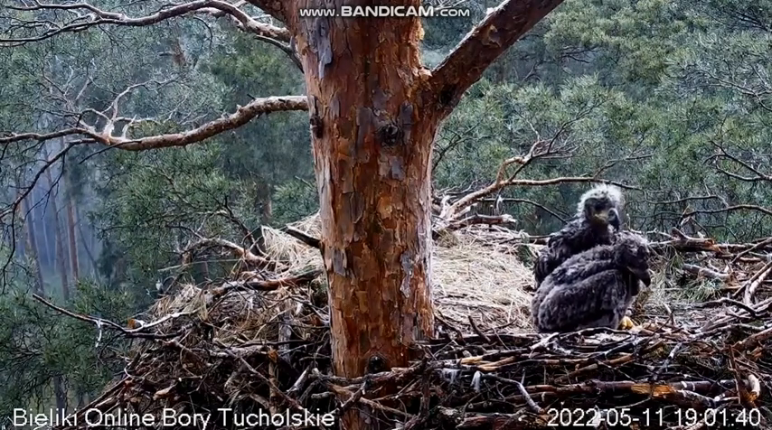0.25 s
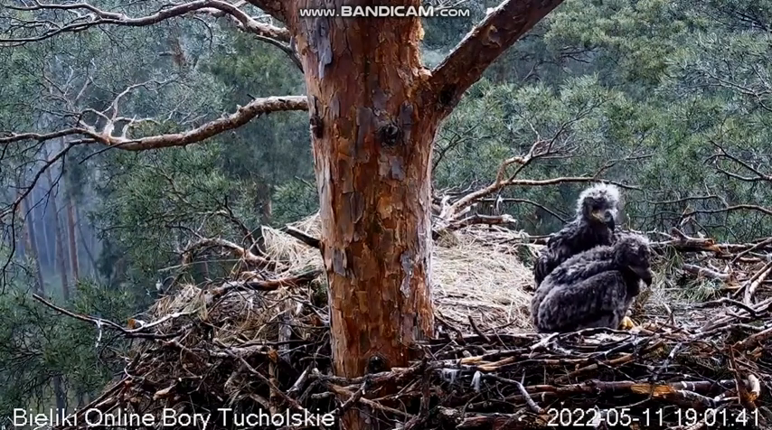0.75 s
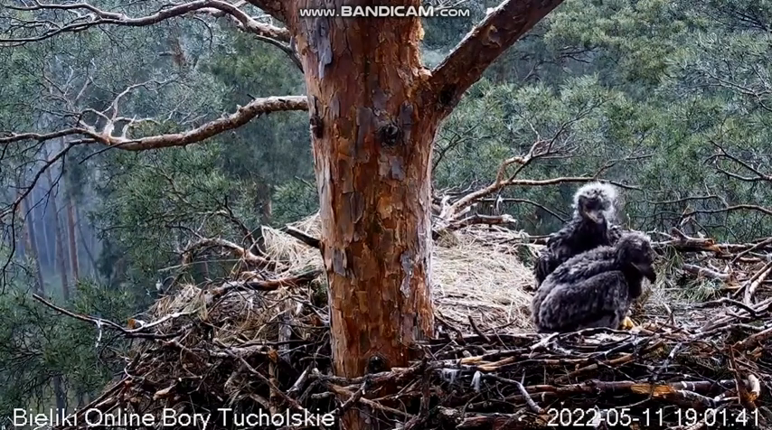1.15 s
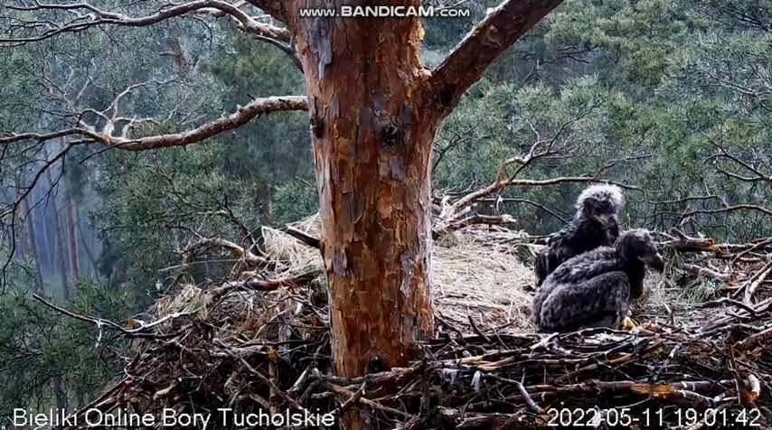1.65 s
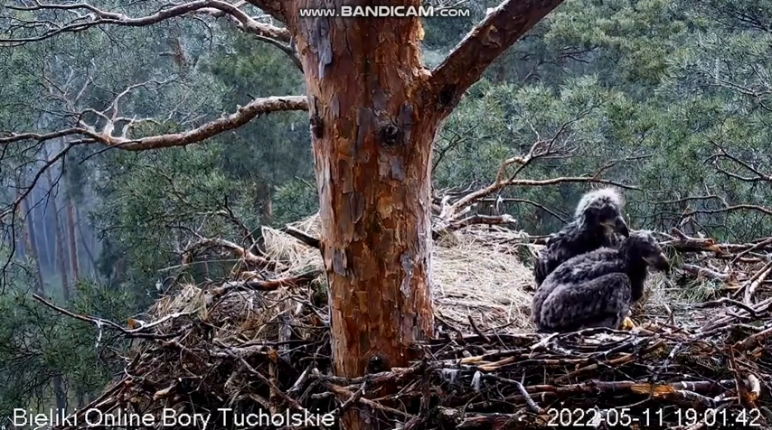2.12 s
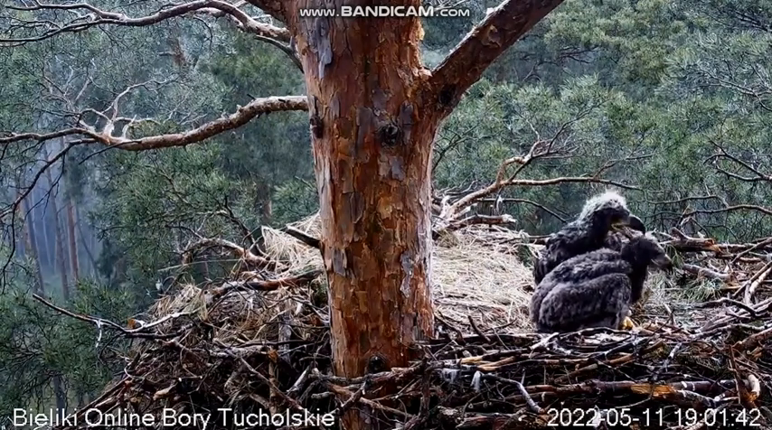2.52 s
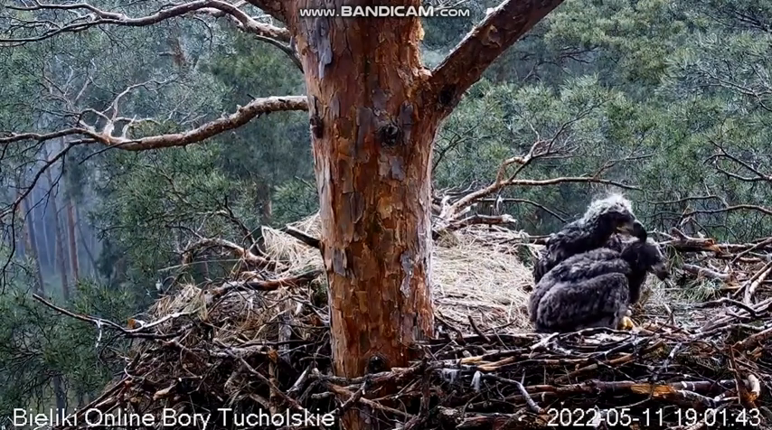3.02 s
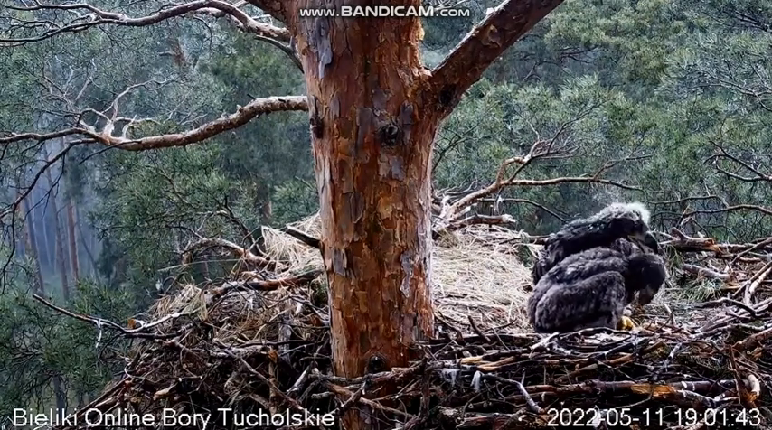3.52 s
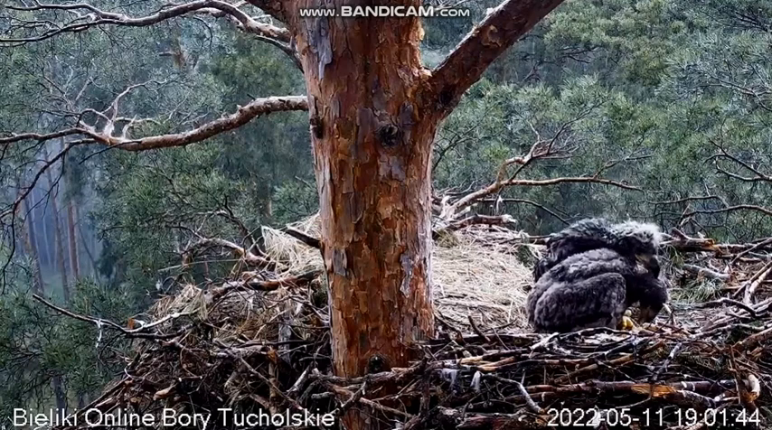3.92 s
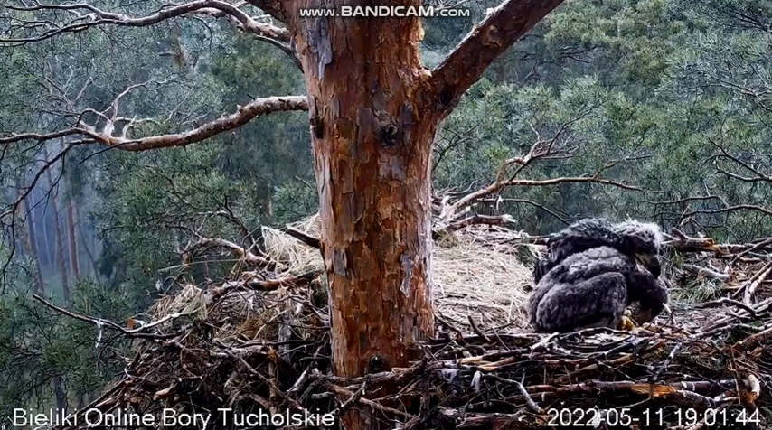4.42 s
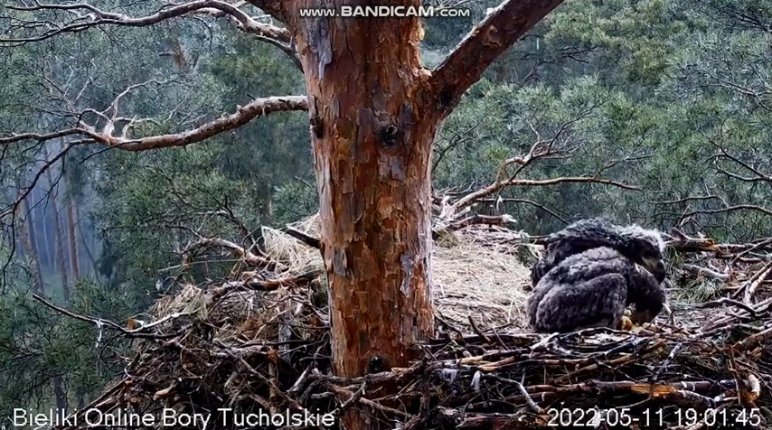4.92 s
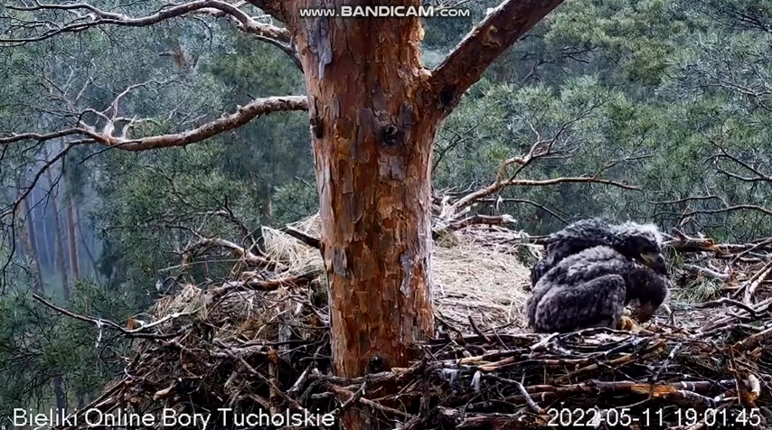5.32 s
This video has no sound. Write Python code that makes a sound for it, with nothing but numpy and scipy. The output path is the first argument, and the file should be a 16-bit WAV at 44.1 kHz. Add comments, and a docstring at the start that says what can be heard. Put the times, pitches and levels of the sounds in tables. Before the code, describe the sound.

Soft, steady rain hisses over a pine forest, with a few fine splashes on nearby needles. Big drips strike the microphone's housing at uneven intervals, each a sharp, briefly ringing knock much louder than the rain. From about halfway, a chick gives a string of faint, very short, high peeps between the knocks. The microphone sits beside a nest high in a tree.

```python
"""Steady rain in a pine forest, heard from a small housed microphone beside a nest high in a tree.
Far rain hisses from the start, and near drops patter and splash on needles and twigs. At 0.2 s the first
big drip knocks on the housing and sets it ringing; more follow unevenly. From 2.6 s a chick peeps in
short gliding whistles, some breaking upward. The rain swells a little near 5 s, and a last drip lands."""
import sys
import numpy as np
from scipy import signal
from scipy.io import wavfile
from scipy.ndimage import uniform_filter1d

SR = 44100
rng = np.random.default_rng(int(sys.argv[2]) if len(sys.argv) > 2 else 0)


def to_wav(sig):
    """Store sig (one row per channel, or 1-D mono) as 16-bit WAV at the path in sys.argv[1].

    Samples outside -1..1 are clipped; the rate is SR.
    """
    pcm = np.clip(np.atleast_2d(sig), -1, 1) * 32767
    pcm = np.round(pcm).astype(np.int16)
    wavfile.write(sys.argv[1], SR, pcm.T)  # frames by channels


N = 245195


def undb(db):
    return 10 ** (np.asarray(db) / 20)


def unit(x):
    return x / np.sqrt(np.mean(x ** 2))


def band(x, lo_hz, hi_hz):
    return signal.sosfilt(signal.butter(2, [lo_hz, hi_hz], "band", fs=SR, output="sos"), x)


def walk(rate):
    """Random levels held 1 / rate s and slewed twice; spread near 1."""
    hold = int(SR / rate)
    steps = np.repeat(rng.standard_normal(N // hold + 1), hold)
    return 1.18 * uniform_filter1d(uniform_filter1d(steps, hold), hold)[:N]


def add(out, start, sound):
    """Mix a short sound in at a time in seconds."""
    i = int(start * SR)
    out[i:i + len(sound)] += sound[:N - i]


MOUNT_TOP_HZ = 180  # modes below this belong to the mount
NODE_DB, NODE_OCTAVES = -20, 0.2  # depth and half-width of a gap
RATTLE_HZ, RATTLE_DB, SPRAY_HZ, SPRAY_DB = 2750, -27, 10000, -4.5  # each follows the strength there
DROPLETS_PER_S, DROPLETS_FADE_S, DROPLETS_DB = 600, 0.004, -15.5
# The ring of the housing and its mount. Each row: pitch in Hz, gain in dB, seconds to fade by 60 dB.
HOUSING_MODES = [(133.8, 6, 0.12), (238.4, 9.5, 0.062), (384, 13, 0.032), (573, 4, 0.029),
                 (733.6, 10, 0.027), (853, 5, 0.015), (1268, 1.5, 0.019), (1595, 4, 0.012),
                 (1996, -13, 0.016), (2265, -13.5, 0.021), (2650, -1.5, 0.011), (3140, -3, 0.0088),
                 (3800, -2, 0.015), (4470, -4, 0.014), (5090, -5.5, 0.019), (5860, -3.5, 0.0078),
                 (6910, -5.5, 0.011), (8980, -20, 0.019), (10110, -7, 0.0068), (12220, -10, 0.0079),
                 (12300, -25, 0.0055)]
# The knocks. Each row: start in seconds, strength in dB, strongest pitch in Hz, roll-off below and
# above it in dB per octave, three node pitches in Hz, sway of the mount in dB, shove in dB.
DRIP_HITS = [(0.2109, -11.5, 2360, 16.5, 14.5, 640, 1270, 7500, -72, -74),
             (0.579, -25, 1120, 0, 7.4, 420, 537, 2940, -54, -32.5),
             (0.694, -46, 1770, 7, 2.5, 760, 3900, 6000, -83, -80),
             (1.182, -48.5, 232, 15, 7.6, 760, 1700, 2700, -73, -50),
             (1.445, -16.5, 1640, 9, 4.7, 1200, 2420, 4260, -47, -78),
             (3.2716, -13, 3880, 5.5, 13.7, 235, 1160, 4540, -44.5, -55),
             (3.385, -43, 930, 7.5, 1.7, 390, 3930, 6000, -79, -63),
             (3.6903, -9.5, 2530, 16.5, 11.8, 1050, 3600, 5740, -83, -86),
             (3.7261, -17.5, 2910, 23, 17, 1060, 3700, 5650, -71, -77),
             (4.524, -49, 1000, 10, 0.6, 235, 1700, 3260, -71, -77),
             (4.661, -11.5, 2120, 12.5, 4.1, 370, 3640, 7800, -58, -82),
             (5.319, -54, 900, 2, 0.63, 235, 1700, 3200, -65, -60),
             (5.5339, -17, 1070, 6.5, 6.7, 260, 1620, 3040, -48, -44.5)]


def drips():
    """Each drip rings the housing; bending waves carry the bass slower, so low modes come late."""
    out, t = np.zeros(N), np.arange(int(.2 * SR)) / SR
    hz, mode_db, t60 = (column[:, None] for column in np.transpose(HOUSING_MODES))
    age = np.maximum(t - 0.027 / np.sqrt(hz) - (16 / hz) ** 2, 0)  # seconds since each mode arrived
    swell = (1 - np.exp(-age * hz / 0.63)) ** 2
    envelope = swell * np.exp(-np.log(1000) * age / t60)
    sign = (-1) ** np.arange(len(hz))[:, None]  # neighbouring modes move the capsule in opposite senses
    is_mount = hz < MOUNT_TOP_HZ
    shove = np.sin(2 * np.pi * np.clip(t / 0.0078, 0, 1))  # the blow pushes the capsule over and back
    for start, db, peak_hz, slope_below, slope_above, *nodes_hz, sway_db, shove_db in DRIP_HITS:
        def strength_db(f):
            octaves = np.log2(f / peak_hz)
            return db - np.maximum(-slope_below * octaves, slope_above * octaves)

        scatter_db, detune = rng.standard_normal((2, len(hz), 1))
        # landing where some modes barely move leaves gaps around the node pitches
        gap_db = NODE_DB * np.exp(-(np.log2(hz / nodes_hz) / NODE_OCTAVES) ** 2).sum(1, keepdims=True)
        drive_db = np.where(is_mount, sway_db, strength_db(hz) + gap_db)
        gain = undb(drive_db + mode_db + scatter_db)
        modes = sign * gain * envelope * np.sin(2 * np.pi * hz * (1 + .01 * detune) * age)
        add(out, start, modes.sum(0) + undb(shove_db) * shove)
        # thrown-up water lands again, fading
        landings = rng.random(len(t)) < DROPLETS_PER_S / SR
        droplets = landings * rng.standard_normal(len(t)) * np.exp(-t / DROPLETS_FADE_S)
        housing_ring = (modes * ~is_mount).sum(0)
        add(out, start, undb(DROPLETS_DB) * signal.fftconvolve(droplets, housing_ring))
        # the water scatters and rattles on for a moment, its finest spray in the treble
        rattle = band(rng.standard_normal(len(t)), 830, 8200) * np.exp(-t / 0.0097)
        spray = band(rng.standard_normal(len(t)), 8700, 15800) * np.exp(-t / 0.002)
        add(out, start, undb(strength_db(RATTLE_HZ) + RATTLE_DB) * rattle)
        add(out, start, undb(strength_db(SPRAY_HZ) + SPRAY_DB) * spray)
    return out


BREAK_S, BREAK_RISE, BREAK_OCTAVE_DB, BREAK_PEAK_AT = 0.0067, 1.053, -27, 0.29
RISE_BEND, FALL_BEND = 2.65, 0.83  # rises come late, falls run nearly straight
# The chick's calls. Each row: start and length in seconds, first and last pitch in Hz, level in dB,
# octave overtone in relative dB, place of the peak from 0 to 1, break pitch in Hz, break level in dB
# (-90 is inaudible).
CHICK_CALLS = [(2.645, 0.03, 3220, 3400, -43.5, -3.5, .77, 3710, -37),
               (2.919, 0.014, 3400, 3246, -39, -14.5, 0.66, 4600, -90),
               (3.637, 0.025, 3280, 3960, -33.5, -25, 0.72, 4770, -53),
               (3.937, 0.024, 3360, 3950, -31.5, -10, 0.74, 4750, -33.5),
               (4.192, 0.023, 3485, 3670, -33.5, -2.5, 0.82, 4660, -30),
               (4.277, 0.0085, 3480, 3140, -43.5, -11, 0.6, 4600, -90),
               (4.41, 0.015, 3110, 4200, -48, -3, 0.81, 4460, -37),
               (4.755, 0.02, 2520, 4230, -48, -1, 0.75, 4600, -90),
               (4.905, 0.0146, 3260, 3760, -35.5, -2, 0.26, 4600, -90),
               (4.971, 0.013, 3710, 3100, -35.5, -4, 0.66, 4600, -90),
               (5.212, 0.015, 3200, 4050, -49.5, -12, 0.9, 4600, -90),
               (5.258, 0.023, 4160, 3130, -37.5, -20, 0.81, 4600, -90)]


def peeps():
    """The chick whistles, its voice sometimes breaking into a higher note; the trunks echo faintly."""
    out = np.zeros(N)
    for start, length, first_hz, last_hz, db, octave_db, peak_at, break_hz, break_db in CHICK_CALLS:
        add(out, start, whistle(length, first_hz, last_hz, db, octave_db, peak_at))
        squeak = whistle(BREAK_S, break_hz, break_hz * BREAK_RISE, break_db,
                         BREAK_OCTAVE_DB, BREAK_PEAK_AT)
        add(out, start + length, squeak)
    t = np.arange(int(.15 * SR)) / SR
    trunks = rng.standard_normal(len(t)) * np.exp(-t / 0.012)
    return out + undb(-43.0) * signal.fftconvolve(out, trunks)[:N]


def whistle(length, first_hz, last_hz, db, octave_db, peak_at):
    """One gliding, slightly hoarse note with its octave."""
    progress = np.linspace(0, 1, int(length * SR))
    bend = RISE_BEND if last_hz > first_hz else FALL_BEND
    phase = 2 * np.pi * np.cumsum(first_hz + (last_hz - first_hz) * progress ** bend) / SR
    skew = np.log(.5) / np.log(np.clip(peak_at, .1, .9))
    swell = np.sin(np.pi * progress ** skew) ** 0.35
    hoarse = 1 + 0.28 * unit(uniform_filter1d(rng.standard_normal(len(progress)), size=60))
    return undb(db) * swell * hoarse * (np.sin(phase) + undb(octave_db) * np.sin(2 * phase))


# Fine splashes on nearby needles. Each row: start in seconds, peak level in dB, pitch in Hz.
NEEDLE_SPLASHES = [(0.1111, -43, 9000), (0.535, -44, 11300), (1.1428, -45.5, 11600), (1.525, -46, 12000),
                   (1.56, -45, 9710), (1.8841, -55, 8380), (2.703, -41, 9000), (2.8928, -54, 10100),
                   (3.117, -44.5, 11500), (5.073, -38.5, 9600)]


def splashes():
    """A small drop bursts into a few milliseconds of high spray."""
    out, t = np.zeros(N), np.arange(int(.06 * SR)) / SR
    for start, db, hz in NEEDLE_SPLASHES:
        burst = band(rng.standard_normal(len(t)) * np.exp(-t / 0.0076), hz / 1.6, hz * 1.19)
        add(out, start, undb(db) * burst / np.abs(burst).max())
    return out


# The colour of the rain bed. Each row: frequency in Hz, relative spectral density in dB.
RAIN_COLOUR = [(24, -56), (40, -26.5), (119, -8.5), (152, -10.5), (281, -6.5), (310, -5), (343, -5),
               (620, -3.5), (833, -0.5), (1240, -8), (1700, -5), (4360, -10.5), (6150, -3.5),
               (12600, -17.5), (14600, -32)]
# Its rise and fall. Each row: time in seconds, level in dB.
RAIN_LEVELS = [(0.0, -56.5), (0.52, -54), (1.07, -56.5), (1.56, -54.5), (1.97, -56), (2.45, -55.5),
               (2.8, -53.5), (3.19, -55.5), (3.9, -53.5), (4.68, -54.5), (4.92, -52), (5.08, -54.5),
               (5.56, -55.5)]


def rain():
    """Far rain hisses, each narrow band flickering alone; nearer drops add bursts across an octave."""
    colour_hz, colour_db = np.transpose(RAIN_COLOUR)
    out, gust = np.zeros(N), walk(1.41)
    drop_tail = np.exp(-np.arange(900) / SR / 0.013)
    for octave_hz in 45 * 2. ** np.arange(9):
        hits = (rng.random(N) < 40 / SR) * undb(2.5 * rng.exponential(size=N))  # about 40 a second
        patter = 1 + undb(-7) * signal.fftconvolve(hits, drop_tail)[:N]
        width = 1 / 4 if octave_hz < 2000 else 1 / 10  # octaves per band
        edge = 2 ** (width / 2)
        for hz in octave_hz * 2 ** np.arange(0, 1 if octave_hz < 8000 else .4, width):
            hiss = unit(band(rng.standard_normal(N) * patter, hz / edge, hz * edge))
            band_db = np.interp(np.log(hz), np.log(colour_hz), colour_db) + 10 * np.log10(hz * width)
            flicker_db = 3.33 * walk(45)
            out += hiss * undb(band_db + .5 * gust + flicker_db)
    times, level_db = np.transpose(RAIN_LEVELS)
    return unit(out) * undb(np.interp(np.arange(N) / SR, times, level_db))


def scene():
    """The rain bed with knocks, splashes and peeps on top, in mono."""
    return (rain() + drips() + splashes() + peeps())[None]


def record(dry):
    """The microphone loses the deep bass, and the top is cut steeply at 14.7 kHz."""
    thin = signal.sosfilt(signal.butter(3, 50, "high", fs=SR, output="sos"), dry)
    return signal.sosfilt(signal.ellip(10, .2, 70, 14700, fs=SR, output="sos"), thin)


dry = scene()
out = record(dry)
to_wav(out)
```